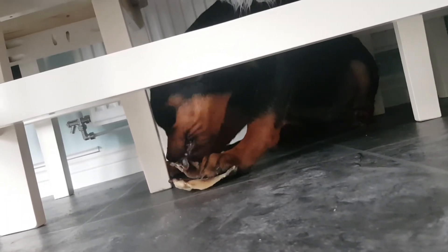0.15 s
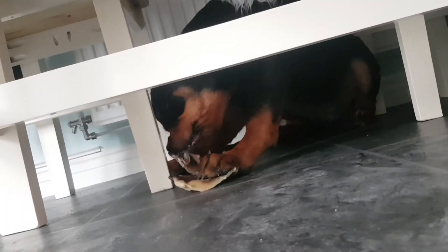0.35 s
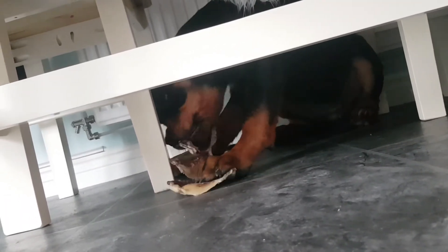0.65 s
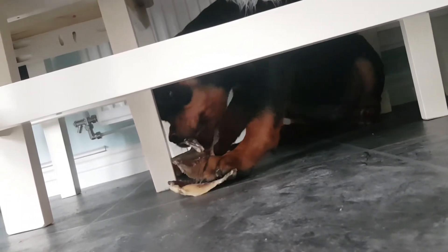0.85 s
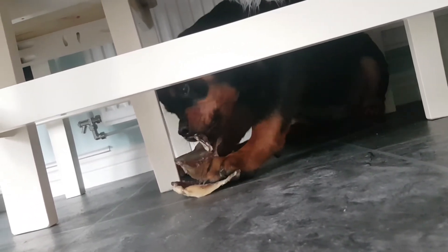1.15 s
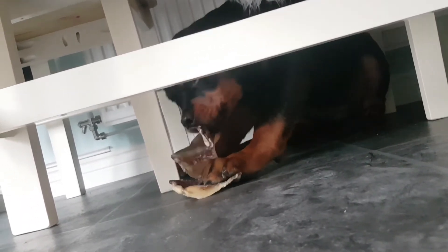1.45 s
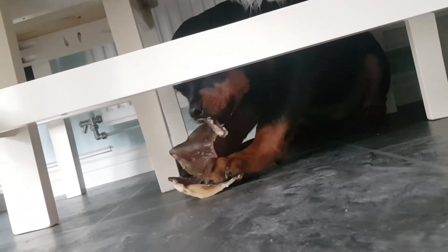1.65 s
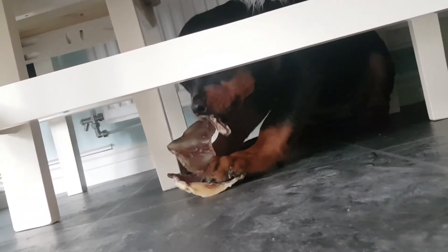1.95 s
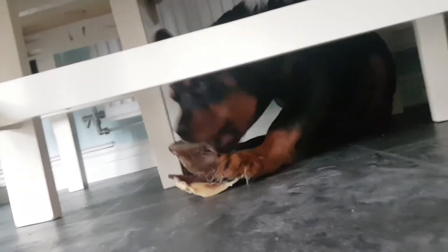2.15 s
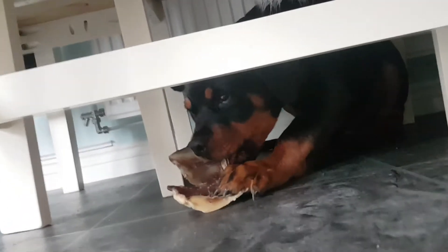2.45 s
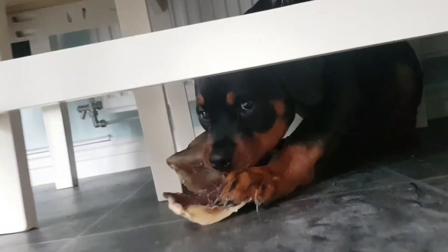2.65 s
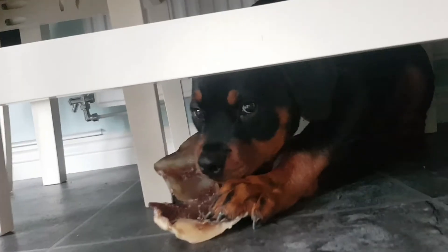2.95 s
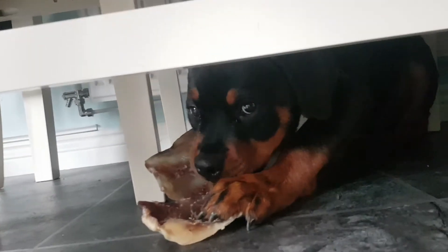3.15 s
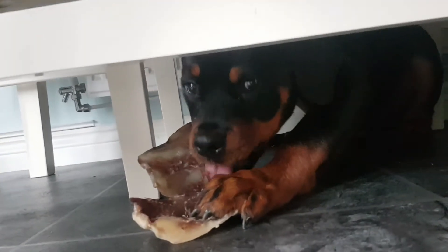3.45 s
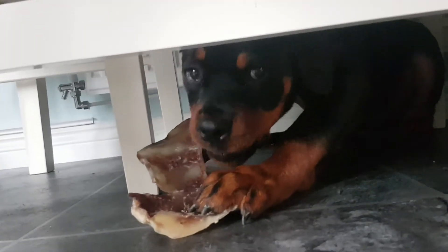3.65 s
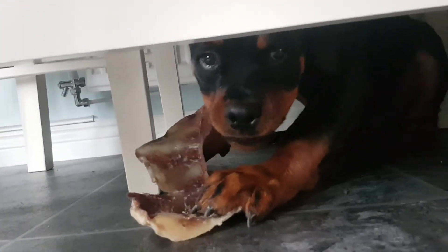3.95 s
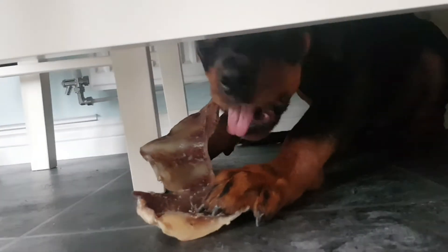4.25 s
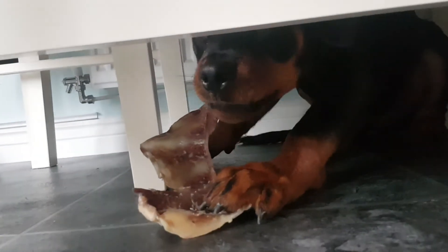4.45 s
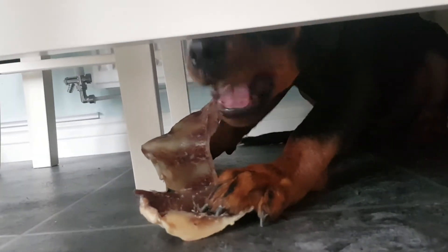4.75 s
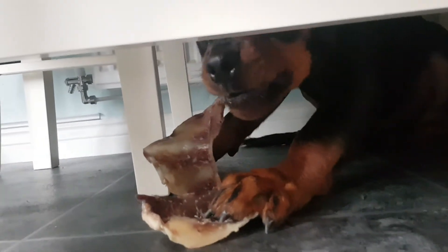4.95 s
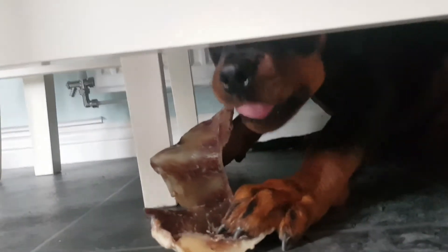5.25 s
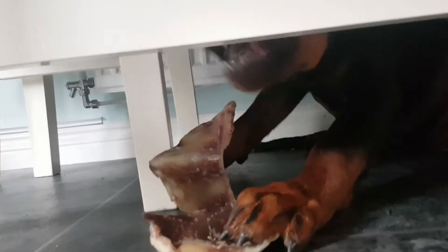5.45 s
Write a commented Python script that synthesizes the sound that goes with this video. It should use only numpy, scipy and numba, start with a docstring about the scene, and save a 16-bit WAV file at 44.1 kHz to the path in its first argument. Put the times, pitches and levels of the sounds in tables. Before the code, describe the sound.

A puppy under a table works at a bone: a brittle burst of knocks early, near silence with faint sniffs, a heavy low thud, snuffling and scattered clicks, then tongue pops and sticky smacks growing louder with breathy puffs. The tiled room rings briefly; the stereo phone pickup has quiet house rumble and soft hiss.

```python
"""A bone knocks and grates on a tiled floor while a puppy's tongue pops and smacks and its nose
snuffles and whistles; the hard, bare room rings on, over house rumble, a faint hum and hiss.
The puppy is under a table, two metres from a hand-held phone. Knocks are rattles of filtered noise,
pops and narrow ticks are short damped tones, smacks are bright ticks of noise, breath is filtered
noise and whistles are wavering sines. A fading noise tail makes the room."""
import sys
import numpy as np
from scipy import signal
from scipy.fft import rfft, irfft, next_fast_len
from scipy.io import wavfile
from scipy.ndimage import uniform_filter1d
from numba import njit

SR = 44100
rng = np.random.default_rng(int(sys.argv[2]) if len(sys.argv) > 2 else 0)


def boost(x):
    """Linear amplitude factor 10**(x/20) for a level x in decibels (scalar or array-like)."""
    u = np.asarray(x, float) / 20
    return 10 ** u


def output_pcm(signal):
    """Save a mono or channel-first signal as 16-bit PCM at the path in sys.argv[1].

    Samples are clipped to [-1, 1] before scaling.
    """
    pcm = np.clip(np.atleast_2d(signal).T, -1, 1) * 32767
    wavfile.write(sys.argv[1], SR, np.round(pcm).astype(np.int16))


N = 247386  # length in samples
T = np.arange(N) / SR  # time in s
FFT = next_fast_len(N)


def band(x, lo_hz, hi_hz):
    """Steep band-pass."""
    sos = signal.butter(3, [lo_hz, min(hi_hz, SR / 2.2)], "bandpass", fs=SR, output="sos")
    return signal.sosfilt(sos, x)


def unit(x):
    """Scale to rms 1."""
    return x / np.sqrt(np.mean(x ** 2))


def coloured(table, channels):
    """Steady noise of rms 1 over all channels, with a spectrum drawn through (Hz, dB) points."""
    hz, db = np.transpose(table)
    f = np.fft.rfftfreq(FFT, 1 / SR)
    gain = boost(np.interp(np.log(f + 1), np.log(hz), db, left=-90, right=-90))
    white = rng.standard_normal((channels, FFT))
    return unit(irfft(rfft(white) * gain, FFT)[:, :N])


def walk(rate):
    """A smooth random wander of rms 1: levels held for 1 / rate seconds, then smoothed twice."""
    k = int(SR / rate)
    held = np.repeat(rng.standard_normal(N // k + 1), k)
    return unit(uniform_filter1d(uniform_filter1d(held, k), k)[:N])


def add(out, s, sound):
    """Mix a short sound in at time s."""
    i = int(s * SR)
    out[..., i:i + sound.shape[-1]] += sound[..., :N - i]


def ring(hz, t60, t):
    """A damped sine that falls by 60 dB in t60 seconds."""
    return np.sin(2 * np.pi * hz * t) * np.exp(-np.log(1000) * t / t60)


def swell(peak_s, rise, fade):
    """Rises to 1 at peak_s, then dies away; both exponentially."""
    return np.exp(np.minimum((T - peak_s) / max(rise, .001), (peak_s - T) / max(fade, .001)))


def gate(start, end, fade):
    """Open from start to end, with soft edges."""
    return np.clip(np.minimum(T - start, end - T) / fade, 0, 1)


def direct(x, lag, pan_db):
    """The straight path: the right microphone hears it lag samples late; pan_db is left minus right."""
    return np.array([boost(pan_db / 2) * x, boost(-pan_db / 2) * np.roll(x, lag)])


@njit
def svf(x, hz, q):
    """Band-pass that can follow a moving centre and sharpness q; its peak gain is sqrt(q)."""
    y, b, l = np.empty(len(x)), 0., 0.
    for i in range(len(x)):
        g = np.tan(np.pi * hz[i] / SR)
        v = (b + g * (x[i] - l)) / (1 + g * (g + 1 / q[i]))
        b, l, y[i] = 2 * v - b, l + 2 * g * v, v / np.sqrt(q[i])
    return y


def hush():
    """Steady hiss of the microphones, unrelated left and right, whose level drifts a little."""
    # spectrum of the hiss: f/Hz, relative level per Hz/dB
    hiss_colour = [(60, 2), (100, -1.5), (170, -9), (300, -10), (600, -17), (1400, -22.5), (3000, -25),
                   (5500, -26.5), (9000, -24.5), (13000, -19.5), (16000, -24.5)]
    drift_db = .5 * walk(6)
    return coloured(hiss_colour, channels=2) * boost(-66 + drift_db)


def hum():
    """A far appliance: each partial is a steady sine inside a narrow, wavering band of noise."""
    # partials of the hum: f/Hz, width/Hz, wavering part level/dB, steady tone level/dB (both rms)
    partials = [(355, 22, -90, -99), (694, 10, -92, -92), (1186, 25, -85.5, -89)]
    out = np.zeros(N)
    for hz, width, waver_db, tone_db in partials:
        waver = unit(band(rng.standard_normal(N), hz - width / 2, hz + width / 2))
        tone = np.sqrt(2) * np.sin(2 * np.pi * hz * T)
        out += boost(waver_db) * waver + boost(tone_db) * tone
    return direct(out, lag=10, pan_db=-2.5)


def rumble():
    """Low noise, mostly shared by the microphones, which rises in short low swells."""
    # spectrum of the rumble: f/Hz, relative level per Hz/dB
    rumble_colour = [(15, -49), (25, -12), (40, 3), (59, 8), (93, 5.5), (128, -4.5), (173, -19),
                     (200, -12.5), (260, -17), (440, -120)]
    # low swells: deep thuds under the knocks, footsteps and handling;
    # before smoothing: t of peak/s, level/dB, fade/s
    low_swells = [(.585, -44, 0.052), (1.27, -63, 0.17), (1.785, -38.5, 0.098), (2.06, -53.5, 0.066),
                  (2.186, -37.5, 0.026), (2.36, -68, 0.045), (2.58, -63, 0.024), (2.65, -66, 0.037),
                  (2.748, -56.5, 0.12), (3.08, -51, 0.0066), (3.15, -65, 0.072), (3.36, -54, 0.014),
                  (3.48, -50.5, 0.049), (3.69, -60, 0.012), (3.798, -57.5, 0.056), (3.999, -48.5, 0.014),
                  (4.141, -51.5, 0.029), (4.28, -59, 0.017), (4.41, -55.5, 0.025), (4.5, -65, 0.066),
                  (4.78, -62, 0.13), (5.02, -54, 0.05), (5.119, -46.5, 0.015), (5.3, -50, 0.066),
                  (5.41, -52.5, 0.065)]
    strength = np.full(N, boost(-65))
    for s, db, fade in low_swells:
        strength += boost(db) * swell(s, 0.02, fade)
    strength = uniform_filter1d(strength, int(0.021 * SR))
    mid, side = coloured(rumble_colour, channels=2)
    # the side part is what differs between left and right
    return strength * (mid + .35 * side * np.array([[1], [-1]]))


def room(x):
    """Echoes off hard walls: a noise tail that fades band by band, its bass shared left and right."""
    # bands of the tail, each blending into the next: f/Hz, time to fall 60 dB/s, relative level/dB
    tail_bands = [(80, 0.33, -2), (171, 0.52, -4), (333, 0.44, -1), (660, 0.43, 2), (1270, 0.37, 0),
                  (2130, 0.4, 3.5), (2840, 0.38, 2), (4000, .4, 0.5), (6000, 0.44, -1.5), (13000, 0.33, -1)]
    t = T[:int(.6 * SR)]
    f = np.log(np.fft.rfftfreq(len(t), 1 / SR) + 1)
    centres = np.log(np.array(tail_bands)[:, 0])
    noise = rfft(rng.standard_normal((2, len(t))))
    tail = np.zeros((2, len(t)))
    for (hz, t60, db), share in zip(tail_bands, np.eye(len(tail_bands))):
        mid, side = irfft(noise * np.interp(f, centres, share), len(t))
        both = mid + min(hz / 900, .9) * side * np.array([[1], [-1]])
        tail += boost(db) * both * np.exp(-np.log(1000) * t / t60)
    tail *= np.clip((t - .005) / 0.006, 0, 1)  # the first walls answer a few ms late
    return signal.fftconvolve(x[None], tail, axes=1)[:, :N]


def whistles():
    """Thin whistles in the nostrils: gliding sines whose pitch and level waver."""
    # one row a whistle: level/dB before wavering, list of pitch points (t/s, f/Hz)
    whistle_glides = [ (-71, [(1.985, 10700), (2.02, 11050), (2.055, 11950), (2.085, 11700), (2.125, 11850),
                      (2.22, 11150), (2.25, 11400), (2.28, 11400), (2.36, 11980), (2.39, 11600),
                      (2.44, 10500)]), (-67, [(2.075, 10450), (2.11, 10600), (2.15, 10480),
                      (2.205, 10020)]), (-72, [(2.235, 9980), (2.3, 10020), (2.36, 9950)])]
    out = np.zeros(N)
    for db, pitch in whistle_glides:
        s, hz = np.transpose(pitch)
        waver_db, waver_hz = 2 * walk(40), 25 * walk(200)
        glide = uniform_filter1d(np.interp(T, s, hz), 600) + waver_hz
        tone = np.sin(2 * np.pi * np.cumsum(glide) / SR)
        out += gate(s[0], s[-1], (s[-1] - s[0]) / 5) * boost(db + waver_db) * tone
    return out


def snuffle():
    """Turbulent air shaped by the nasal passage: broad puffs with a wet fizz, and narrow sniffs."""
    # puffs through nose and mouth, before mixing: start t/s, level/dB, start to peak/s, fade/s, f/Hz
    puffs = [(.36, -63.5, 0.078, 0.067, 4500), (1.88, -66, 0.014, 0.95, 4320),
             (2.071, -58.5, 0.052, 0.04, 5160), (2.18, -54.5, 0.016, 0.021, 4600),
             (2.34, -55.5, 0.012, 0.021, 4200), (2.491, -56, 0.014, 0.022, 4500),
             (2.88, -66, 0.01, 0.02, 3900), (2.972, -61, 0.025, 0.045, 4800),
             (3.04, -72, 0.0077, 0.024, 4770), (3.29, -63, 0.017, 0.04, 3920),
             (3.45, -72, 0.045, 0.3, 5840), (4.03, -60, 0.07, 0.026, 4600),
             (4.235, -54.5, 0.035, 0.039, 4260), (4.4, -58.5, 0.051, 0.02, 5230),
             (4.55, -66.5, 0.078, 0.18, 5200), (4.789, -51, 0.015, 0.074, 4970),
             (5.047, -49.5, 0.054, 0.096, 4500), (5.234, -50, 0.012, 0.03, 4800),
             (5.33, -50, 0.048, 0.057, 4000), (5.467, -46, 0.01, 0.0036, 3620),
             (5.479, -57, 0.015, 0.17, 3640)]
    # narrow sniffs through the nostrils: start t/s, level/dB, length/s, f/Hz
    sniff_list = [(.72, -67.5, .19, 4200), (.82, -76, .14, 3850), (1.26, -74, .06, 3900),
                  (1.262, -76, .055, 4700), (1.265, -74, .07, 6600), (1.47, -76, .05, 5100),
                  (1.56, -80, .17, 5120)]
    air = rng.standard_normal(N) * boost(2.34 * walk(24))
    nostril = band(air, 6700, 6730)
    crackle = rng.standard_normal(N) * boost(2.2 * rng.exponential(size=N))
    fizz = unit(band(crackle, 8000, 15000))

    def nose(hz, sharpness):
        """Air through a passage that resonates at hz, plus a fixed narrow nostril resonance."""
        passage = svf(air, np.full(N, float(hz)), np.full(N, float(sharpness)))
        return 1.47 * passage + 1.1 * nostril

    sniffs = np.zeros(N)
    for s, db, length, hz in sniff_list:
        sniffs += boost(db) * gate(s, s + length, .02) * nose(hz, 18)
    out = np.zeros(N)
    for s, db, rise, fade, hz in puffs:
        fizz_db = -5 + 18 * np.log2(hz / 4500)  # a tighter, higher passage fizzes more
        out += boost(db) * swell(s + rise, rise / 2, fade) * (nose(hz, 0.77) + boost(fizz_db) * fizz)
    return out, sniffs


def smacks():
    """Threads of spit snapping: tiny bright ticks of filtered noise, different left and right."""
    # snaps, levels before the filter: t/s, level/dB, f/Hz, left minus right/dB
    snaps = [(0.4805, -52, 5540, -7), (0.857, -54, 7000, -10), (1.95, -53.5, 12400, 8),
             (1.967, -54, 6900, -6), (2.13, -47, 10500, 1), (2.217, -46, 5330, 10), (4.2433, -51, 4870, 3),
             (4.273, -44.5, 12600, 6), (4.4185, -46.5, 5530, 7), (4.456, -51, 11800, 10),
             (4.585, -55, 5800, 10), (4.635, -54, 13000, 17), (4.72, -40, 11800, 1), (4.742, -45, 12400, 6),
             (4.781, -40.5, 12400, 8), (4.8, -31, 9800, 9), (4.818, -40, 6650, 21),
             (4.832, -41.5, 5660, 20), (4.8934, -45, 5700, 4), (5.24, -46, 12500, 8),
             (5.3454, -49, 6000, -11), (5.4, -43, 11100, 19), (5.4186, -47.5, 11800, -14)]
    t = T[:int(.03 * SR)]
    shape = (1 - np.exp(-t / 0.00055)) * (np.exp(-t / 0.0029) + 0.26 * np.exp(-t / 0.074))
    out = np.zeros((2, N))
    for s, db, hz, pan_db in snaps:
        tick = band(rng.standard_normal((2, len(t))) * shape, hz / 1.58, hz * 1.24)
        add(out, s, boost(db + np.array([[pan_db], [-pan_db]]) / 2) * tick)
    return out


def short_tones():
    """Short damped tones: tongue pops, plus high narrow ticks and a ringing knock at 2.82 s."""
    # tones, before mixing: t/s, level/dB, ring f/Hz, upper tones level/dB, length/s
    tone_list = [(2.205, -43.5, 1083, -44, 0.012), (2.221, -42.5, 1295, -32, 0.0083),
                 (2.501, -53.5, 4000, -29, 0.0034), (2.817, -53, 1160, -24, 0.0043),
                 (2.817, -51, 3270, -45, 0.006), (2.815, -60, 3950, -45, 0.0069),
                 (2.838, -56, 3495, -42, 0.015), (2.832, -60, 4000, -47, .012),
                 (2.823, -55.5, 2810, -33, 0.013), (3.3, -65, 4020, -51, 0.0065),
                 (3.302, -59.5, 2580, -49, 0.0067), (3.303, -65, 1580, -45, 0.0097),
                 (3.317, -55, 930, -30.5, 0.0085), (3.342, -45, 873, -54, 0.0038),
                 (3.364, -50.5, 820, -43, 0.0041), (3.39, -59, 795, -43, 0.0047),
                 (3.532, -48.5, 857, -43.5, 0.012), (3.706, -67, 790, -43.5, 0.0079),
                 (3.926, -65, 800, -33, 0.012), (4.058, -56, 4150, -21.5, 0.0029),
                 (4.092, -55, 790, -33, 0.0063), (4.095, -54, 1920, -55, 0.0072),
                 (4.117, -48, 798, -24.5, 0.0026), (4.244, -57.5, 830, -28.5, 0.017),
                 (4.258, -53.5, 3500, -40, .005), (4.272, -44.5, 1026, -32, 0.0061),
                 (4.42, -38.5, 875, -38, 0.0081), (4.585, -56, 760, -27, 0.0048),
                 (4.588, -54, 1035, -38, 0.0072), (4.633, -57, 1620, -29.5, 0.0054),
                 (4.749, -44.5, 1390, -55, 0.0052), (4.75, -44.5, 1036, -36, 0.0099),
                 (4.819, -54, 530, -54, 0.011), (4.8199, -29, 1230, -36, 0.0023),
                 (4.895, -39, 834, -36, 0.0061), (5.4745, -18, 1337, -31.5, 0.0038),
                 (5.48, -41.5, 3610, -46, 0.0047)]
    # upper tones: multiple of the ring frequency, relative level/dB
    upper_tones = [(1.38, 19.5), (1.7, 18), (2.371, 19), (2.73, 17.5)]
    t = T[:int(.03 * SR)]
    out = np.zeros(N)
    for s, db, hz, upper_db, length in tone_list:
        first = np.sin(2 * np.pi * hz * t)
        upper = sum(boost(d) * np.sin(2 * np.pi * k * hz * t) for k, d in upper_tones)
        wet = band(rng.standard_normal(len(t)), hz / 1.48, hz * 1.14)
        shape = (1 - np.exp(-t / 0.00054)) ** 2 * np.exp(-(t / length) ** 2.2)
        # higher tones get more noise
        add(out, s, boost(db) * (first + boost(upper_db) * upper + 0.5 * hz / 1000 * wet) * shape)
    return out


def knocks():
    """Each blow is a short rattle of contacts; the heavy floor answers slower than the brittle bone."""
    # knocks of bone on tiles; the last row is a bright rustle under the loud pop.
    # before mixing: t/s, floor thud level/dB, bone level/dB,
    # hardness (0 dull, 3 brittle, above 3 weaker and tilted to the treble),
    # focus (1 usual, higher for a narrow tick)
    blows = [ (0.519, -82, -45, 3.1, 2.4), (0.532, -80, -49, 2.73, 2.3), (0.548, -39.5, -33, 2.7, 0.88),
             (.554, -41, -31.5, 1.7, 1.1), (.560, -42.5, -37, 1.6, 0.7), (0.571, -43.5, -49, 0.96, 1.2),
             (.586, -34, -36, 1.54, 2.7), (.598, -44, -42.5, 0.16, 1.5), (.610, -40, -60, 1.1, 1.6),
             (.625, -42.5, -39, 1.54, 1.9), (1.714, -59, -64.5, .1, 0.59), (1.727, -51, -66, .1, 1.1),
             (1.74, -49, -75, .1, 1.5), (1.758, -33.5, -42, 0.13, 0.95), (1.76, -80, -65, 3, 1.5),
             (1.764, -37, -36.5, 0.044, 0.86), (1.773, -37.5, -43, 0.04, 0.56),
             (1.783, -43, -48.5, .04, 0.81), (1.812, -39.5, -42.5, 0.022, 0.89),
             (2.11, -46, -61, 0.11, 0.84), (2.126, -43.5, -56, 0.22, 0.89), (2.144, -36, -47.5, 0.11, 2.2),
             (2.158, -48, -52, .1, 2), (2.172, -39.5, -55, 0.26, 0.86), (2.19, -45, -54, .2, 0.84),
             (2.207, -49, -46, 0.087, 1), (2.219, -50, -46.5, 0.92, 1.4), (2.231, -67, -55, 0.54, 1.7),
             (2.34, -52, -55, .2, 1.3), (2.356, -50.5, -50.5, 0.1, 1.4), (2.364, -48, -50.5, 0.13, 0.73),
             (2.38, -55, -54.5, 0.5, 0.91), (2.398, -53, -57.5, 0.95, 0.43), (2.415, -54.5, -61, 1, 0.79),
             (2.5, -81, -73, 2.05, 1.2), (2.567, -56, -47.5, 0.63, 3.2), (2.578, -61.5, -52.5, 0.69, 2.7),
             (2.59, -56, -49, 0.59, 3), (2.602, -57, -63, 0.42, 2.3), (2.818, -77, -65, 3, 3.5),
             (2.832, -89.5, -58.5, 2.18, 3), (2.845, -85, -58, 2.6, 2.3), (2.986, -77, -53.5, 4.1, 1.6),
             (3.044, -53.5, -51.5, 1.15, 1.2), (3.056, -49.5, -56, 0.52, 1.6), (3.067, -55, -55, 0.13, 1),
             (3.084, -73, -49.5, 1, 3.3), (3.19, -82, -65, .05, 1.2), (3.3, -67, -68, 1.3, 1.4),
             (3.335, -67, -57, 0.84, 1.3), (3.38, -79, -60.5, 0.37, 1.2), (4.059, -66.5, -58.5, 5.8, 0.35),
             (4.945, -51, -68, .05, 3.2), (4.989, -65, -67.5, .1, 0.95), (5.322, -61, -60.5, 1.5, 0.83),
             (5.342, -60.5, -56.5, 1, 0.55), (5.37, -69, -61.5, 1.1, 0.91), (5.399, -60, -52, 1.1, 1.5),
             (5.415, -69, -55.5, 1.5, 1.4), (5.472, -53, -39, 1.33, 0.96)]
    # parts of a knock, the floor's thud, then the bone from dull to brittle:
    # low f/Hz, high f/Hz, rise/s, rattle length/s
    knock_parts = [(110, 332, 0.0094, 0.0073), (473, 815, 0.0025, 0.0038), (886, 1686, 0.0028, 0.0019),
                   (1730, 3290, 0.0036, 0.0057), (3900, 13000, 0.0018, 0.0058)]
    # what floor and bone ring with: f/Hz, relative level/dB, time to fall 60 dB/s
    floor_modes = [(74.2, 17, 0.16), (178.2, 6, 0.087), (251.5, 0, 0.083), (404, -13, 0.2),
                   (605, 3.5, 0.069), (712.4, 1, 0.13), (1036, 7, 0.19), (1230, -31.5, 0.16)]
    t = T[:int(.1 * SR)]
    chance = rng.standard_normal((len(blows), 2, len(t)))
    contacts = chance[:, 0] * boost(0.68 * chance[:, 1] ** 2)  # a few contacts are much harder than the rest
    parts = np.zeros((len(knock_parts), N))
    for k, (lo_hz, hi_hz, rise, length) in enumerate(knock_parts):
        shape = (1 - np.exp(-t / rise)) * np.exp(-t / length)
        rattles = band(contacts * shape, lo_hz, hi_hz)
        for (s, thud_db, bone_db, hardness, focus), rattle in zip(blows, rattles):
            # bone parts are weaker the further they lie from the row's hardness
            steps_away = abs(k - 1 - hardness)
            db = thud_db if k == 0 else bone_db - focus * 6.5 * steps_away
            even = rattle / np.sqrt(4 * np.sum(rattle ** 2) / (length * SR))
            add(parts[k], s, boost(db) * even)
    body = sum(boost(db) * ring(hz, t60, T[:SR // 3]) for hz, db, t60 in floor_modes)
    # the thud and the dullest bone part set the floor and bone ringing
    ringing = signal.fftconvolve(parts[0] + parts[1], body)[:N]
    return parts.sum(0) + boost(-49.0) * ringing


def scene():
    """The bone is screened by the table legs and heard much off the walls; the mouth faces the phone."""
    bone, tones, spit, whistle = knocks(), short_tones(), smacks(), whistles()
    air, sniffs = snuffle()
    near = direct(boost(6.0) * bone, lag=1, pan_db=-1)
    near += direct(boost(2.5) * tones + boost(-4.0) * air, lag=10, pan_db=-3.5)
    near += direct(whistle + sniffs, lag=8, pan_db=-3.5)
    near += spit
    walls = room(boost(-26.0) * bone)
    walls += room(boost(-33.5) * tones + boost(-41.0) * spit.mean(0) + boost(-33.5) * air)
    return near + walls + rumble() + hum() + hush()


def roll_off(x):
    """The treble ends steeply here."""
    return signal.sosfilt(signal.butter(12, 15390, fs=SR, output="sos"), x)


def record(dry):
    """Each microphone colours the sound in its own way, and the top is cut steeply."""
    # microphone response: f/Hz, level/dB, left minus right/dB
    mic_response = [(17.7, -26, 5), (32, -6.5, -4), (59, -4, -4.5), (270, -1, -1), (1030, 0, -4),
                    (4000, -3, -5), (6540, -0.5, -7), (8500, -10.5, -4), (9760, -4, 1.5),
                    (11800, -0.5, -1.5), (14100, -2.5, 3.5)]
    hz, db, left_db = np.transpose(mic_response)
    f = np.log(np.fft.rfftfreq(FFT, 1 / SR) + 1)
    gain = [boost(np.interp(f, np.log(hz), db + side * left_db / 2)) for side in (1, -1)]
    mix = irfft(rfft(dry, FFT) * gain, FFT)[:, :N]
    return roll_off(mix)


dry = scene()
out = record(dry)
output_pcm(out)
```